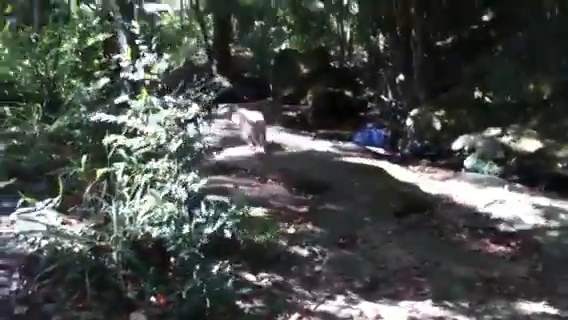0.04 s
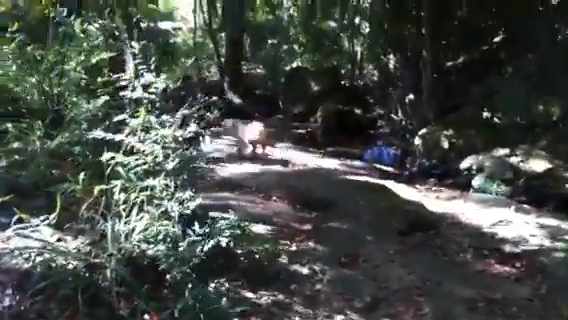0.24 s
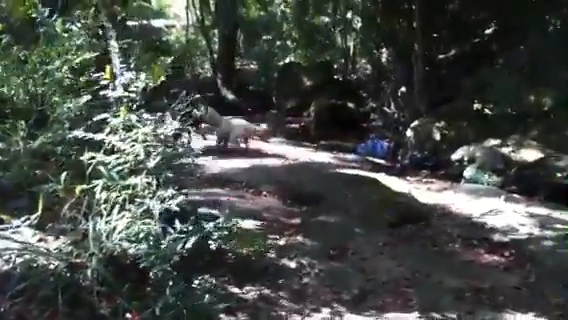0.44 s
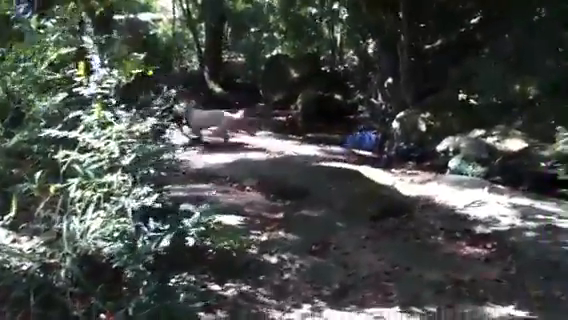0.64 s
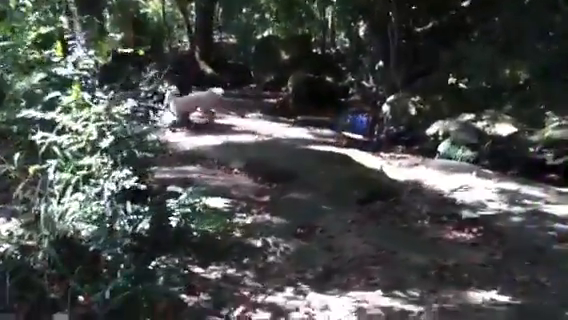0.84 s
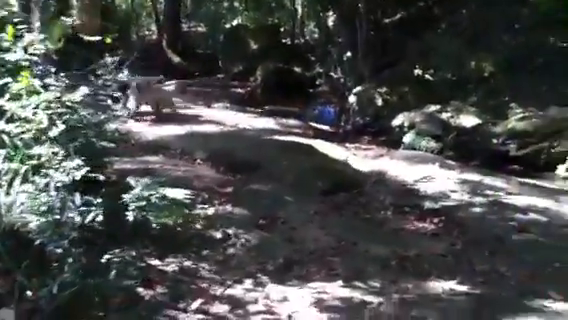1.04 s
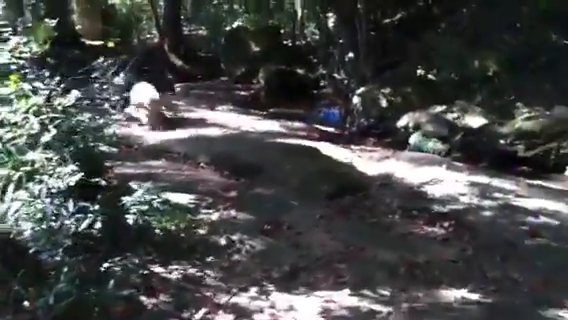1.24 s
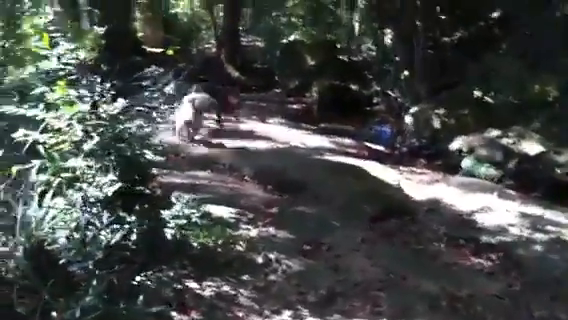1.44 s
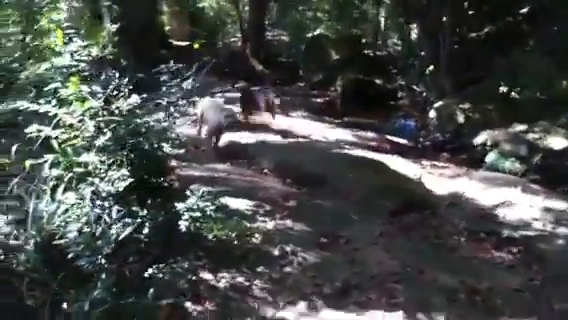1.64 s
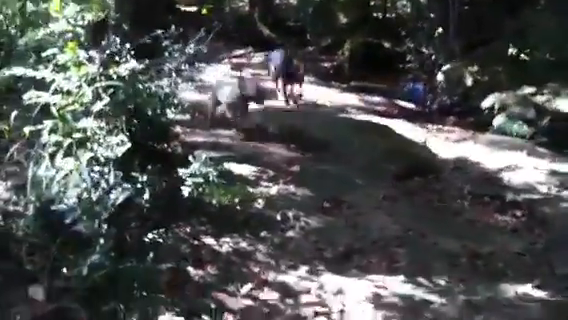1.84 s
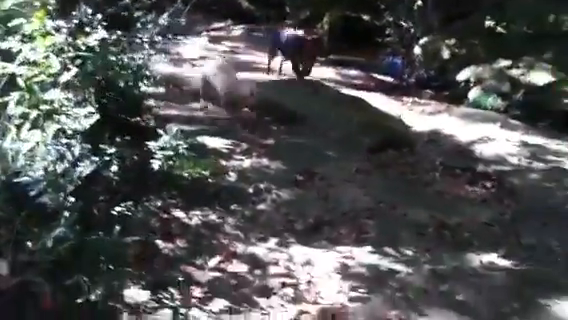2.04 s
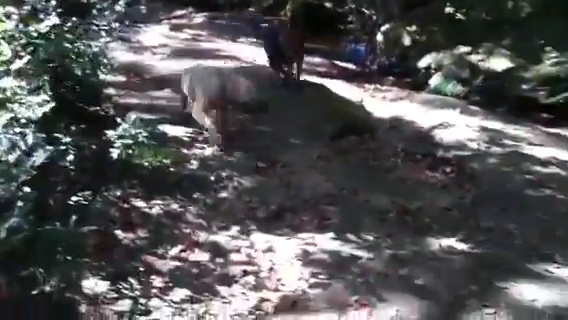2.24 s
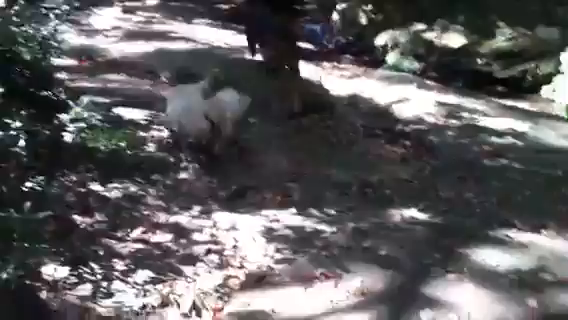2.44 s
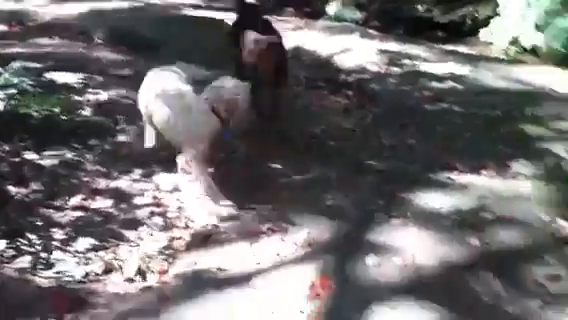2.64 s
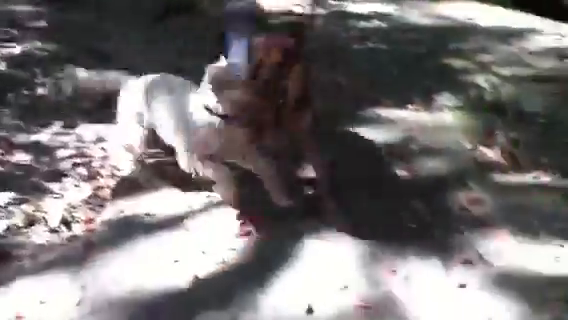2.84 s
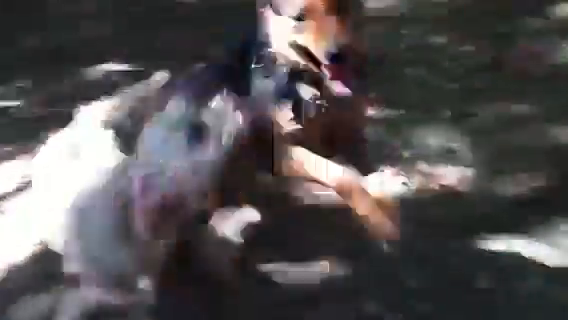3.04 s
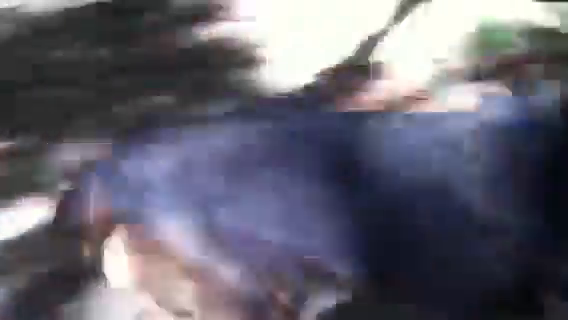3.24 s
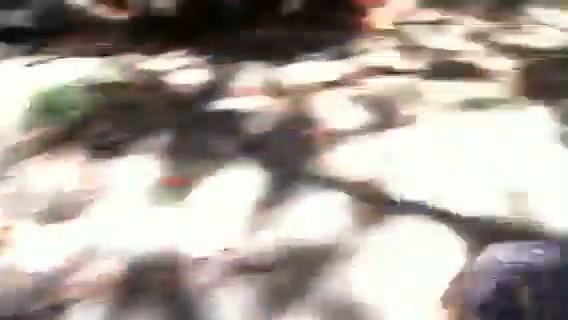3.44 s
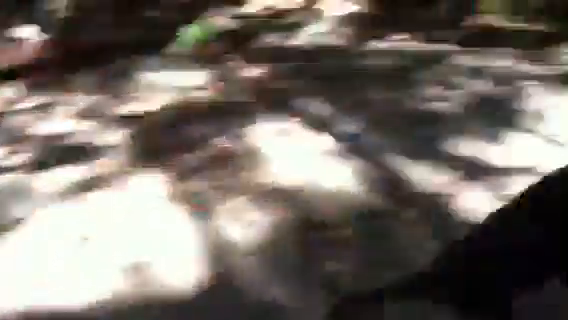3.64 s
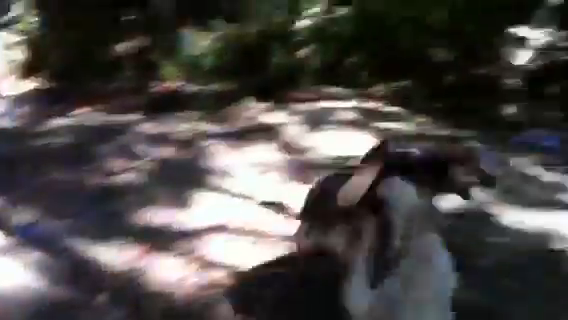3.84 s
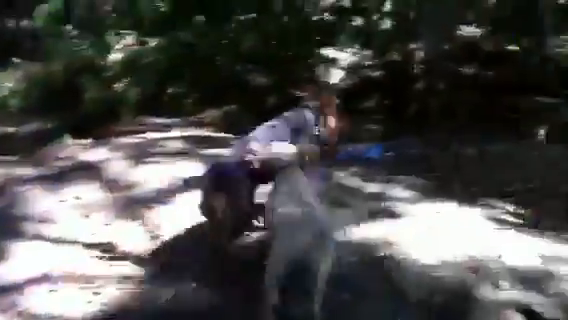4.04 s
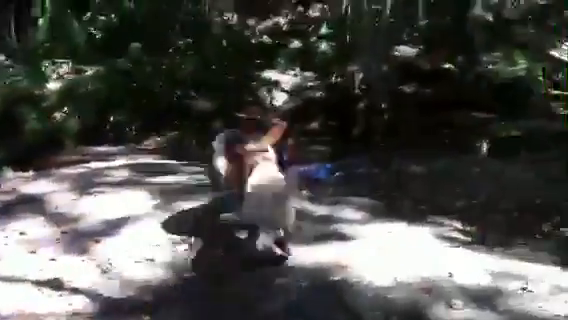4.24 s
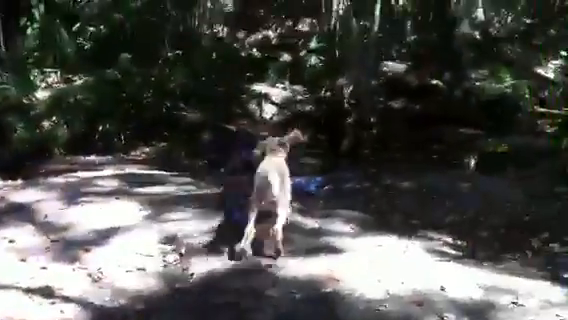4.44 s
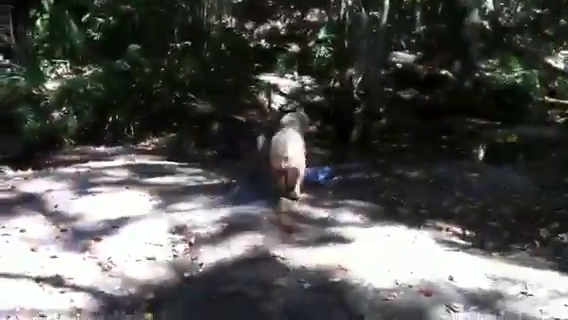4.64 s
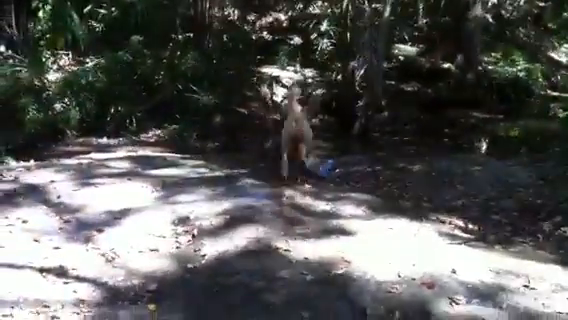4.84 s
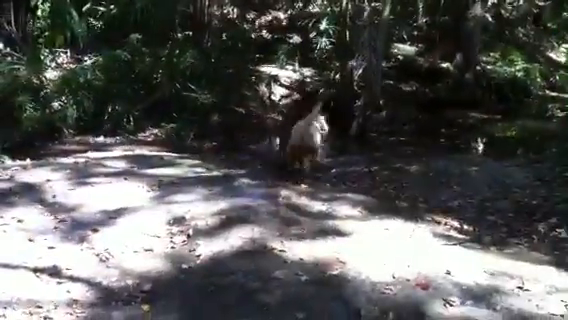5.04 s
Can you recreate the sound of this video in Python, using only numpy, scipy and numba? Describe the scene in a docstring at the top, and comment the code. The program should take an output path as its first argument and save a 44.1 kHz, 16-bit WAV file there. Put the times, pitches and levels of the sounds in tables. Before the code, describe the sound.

Dogs wrestle on a leafy forest track: faint grunts, a sharp twig snap, then loud rough growls close by amid scuffing dry leaves.

```python
"""Dogs wrestling on a forest track

Dogs wrestle close to a phone on a leafy track: uneven vocal-fold flaps and the air they let through
drive chest, mouth and teeth resonances as long rough growls and short grunts. Shaped noise makes paws
scuffing dry leaves and grit, thudding and shaking the earth; ringing modes make a clinking collar tag
and one twig that snaps close by. Noise of a slowly wavering level is the hush of the woods behind.
"""
import sys
import numpy as np
from scipy import signal
from scipy.fft import rfft, irfft, next_fast_len
from scipy.io import wavfile
from scipy.ndimage import uniform_filter1d, map_coordinates
from numba import njit

SR = 44100
rng = np.random.default_rng(int(sys.argv[2]) if len(sys.argv) > 2 else 0)


def magnitude_from_level(level_db):
    """Linear magnitude for a level in decibels (20 dB per decade)."""
    exponent = np.asarray(level_db, float) / 20
    return 10 ** exponent


def file_out(sig):
    """Save sig as 16-bit WAV at sys.argv[1]."""
    # one column per channel
    cols = np.atleast_2d(sig).T
    # limit, then scale
    lim = np.clip(cols, -1, 1)
    pcm = np.round(lim * 32767).astype(np.int16)
    wavfile.write(sys.argv[1], SR, pcm)


N = 225262  # samples, about 5.1 s

# Leaves stirred by running dogs. Each row: time in seconds, level in dB.
LEAF_LEVEL = [(0.0, -52.5), (0.41, -55), (1.16, -59), (1.45, -51.5), (1.56, -59), (1.77, -55), (1.93, -51),
              (2.09, -55), (2.32, -59.5), (2.53, -49.5), (2.67, -53), (2.81, -51), (3.45, -51.5),
              (3.64, -48.5), (3.91, -48), (4.16, -54), (4.42, -58.5), (4.53, -48.5), (4.84, -61.5),
              (5.1, -53.5)]
# Spectrum of dry leaves. Each row: frequency in Hz, relative density in dB per Hz.
LEAF_SPECTRUM = [(500, 0), (1200, -1), (3000, 0), (4500, 2), (7000, 0), (10000, -1), (13000, -2.5),
                 (15500, -7), (16000, -63)]


def unit(x):
    """Scale to rms 1."""
    return x / np.sqrt(np.mean(x ** 2) + 1e-20)


def curves(rows, outside):
    """One value per sample for each column after the time; outside=None holds the end values."""
    s, *cols = np.transpose(rows)
    return [np.interp(np.arange(N) / SR, s, c, outside, outside) for c in cols]


def wobble(rate):
    """A smooth random curve, rate knots a second."""
    knots = rng.standard_normal(int(N * rate / SR) + 4)
    return map_coordinates(knots, [np.arange(N) * rate / SR])


def filtered(x, response):
    """x times a complex response of frequency."""
    m = next_fast_len(len(x) + 8192)
    spectrum = rfft(x, m) * response(np.fft.rfftfreq(m, 1 / SR))
    return irfft(spectrum, m)[:len(x)]


def colour(points):
    """Gain of (Hz, dB) points on a log axis."""
    f, db = np.transpose(points)
    return lambda hz: magnitude_from_level(np.interp(np.log(hz + 1), np.log(f + 1), db))


def modes(table):
    """Causal response of (Hz, width in Hz, dB) resonances, alternating in sign."""
    def response(f):
        total = 0
        for k, (centre, width, db) in enumerate(table):
            damping = 1j * f * width
            total = total + (-1) ** k * magnitude_from_level(db) * damping / (centre * centre - f * f + damping)
        return total
    return response


@njit
def sliding(x, hz, width_hz, sr):
    """A resonance whose centre moves sample by sample."""
    y, r = np.zeros(len(x)), np.exp(-np.pi * width_hz / sr)
    for i in range(2, len(x)):
        turn = 2 * r * np.cos(2 * np.pi * hz[i] / sr)
        y[i] = x[i] - x[i - 2] + turn * y[i - 1] - r * r * y[i - 2]
    return y


def folds(rate_hz, jitter, scatter_db):
    """Slack vocal folds: uneven flaps, and the noisy air that each lets through."""
    phase = np.cumsum(rate_hz * np.exp(jitter * wobble(60) + .1 * wobble(4))) / SR
    flaps = np.diff(np.floor(phase), prepend=0) * magnitude_from_level(scatter_db * wobble(70))
    # each opening decays with a 4 ms time constant
    opening = unit(signal.lfilter([1], [1, -np.exp(-1 / (.004 * SR))], flaps))
    air = (opening + .9) * rng.standard_normal(N)
    return unit(flaps), unit(air)


def even(x):
    """Steady lung pressure holds the power constant over a few flaps."""
    return x / np.sqrt(np.abs(uniform_filter1d(x ** 2, size=2200)) + 1e-9)


def grunt(s, held, db, mouth_db, hz, rasp_db):
    """Quick attack, a sagging hold and a release, as growl rows; the mouth opens on the way."""
    attack_s, release_s = 0.017, 0.05
    edge_db, sag_db, opens_db = 22, 7, 3
    times = s + np.cumsum([0, attack_s, held, release_s])
    levels = db - np.array([edge_db, 0, sag_db, edge_db])
    opens = opens_db * np.array([-.5, -.5, .5, .5])
    return [(t, level, mouth_db + o, hz, rasp_db + o) for t, level, o in zip(times, levels, opens)]


def growls():
    """The flaps thump in the chest; flaps and air rasp through the moving mouth."""
    # Long growls, one list each. Each row: time in seconds, chest level in dB, mouth in dB over chest,
    # mouth resonance in Hz, rasp in dB over chest.
    growl_rows = [
        [(0.56, -70, -2, 738, 3), (0.572, -62, -9, 790, -9), (0.632, -47.5, -0.5, 744, -17),
         (0.718, -46.5, -7.5, 813, -21), (0.74, -47.5, -13, 692, -26), (0.764, -50, 1, 680, -12),
         (0.874, -47, -3.5, 805, -28), (1.024, -49.5, -3.5, 684, -2.5), (1.075, -60, 0, 800, -16)],
        [(3.025, -56.5, 10, 930, 6.5), (3.084, -59, 13.5, 820, 6), (3.105, -48, -1, 1060, -22),
         (3.14, -40, 8, 696, -30), (3.158, -38.5, -10, 720, -17), (3.196, -37.5, 1.5, 860, -14),
         (3.225, -40.5, 6.5, 1030, -15), (3.25, -41, 0, 990, -26), (3.275, -37, 1.5, 1000, -10),
         (3.312, -36.5, 3.5, 860, -9), (3.362, -41, 2.5, 670, -10), (3.39, -65, -29, 711, -10)],
        [(3.58, -64, -15, 694, 14), (3.598, -54, 9, 664, 15), (3.618, -35.5, 2.5, 710, -22),
         (3.645, -36.5, 0, 780, -19), (3.668, -38.5, -2, 876, -27), (3.73, -38.5, 1.5, 725, -32),
         (3.764, -41.5, 5, 910, -18), (3.798, -31.5, -9, 740, -27), (3.814, -42, 3, 660, -19),
         (3.84, -37.5, 2.5, 730, -24), (3.872, -36.5, 0, 1060, -22), (3.884, -44, 4.5, 880, -27),
         (3.916, -43.5, 6, 870, -23), (3.976, -35.5, 2.5, 705, -26), (4.038, -56.5, -0.5, 700, -16)],
        [(4.245, -55, -2, 863, 12), (4.261, -53, 8, 870, -12), (4.277, -40, 3.5, 870, -3),
         (4.33, -41, -7.5, 884, -15.5), (4.46, -45.5, -5, 910, -12.5), (4.513, -50, -3, 730, -22),
         (4.579, -42, -2.5, 830, -14), (4.607, -47.5, 1.5, 876, -9), (4.681, -42, 0, 840, -11),
         (4.72, -71, -5, 775, 1)],
    ]
    # Short grunts and snorts. Each row: start in seconds, hold in seconds, chest level in dB,
    # mouth in dB over chest (mid-opening), mouth resonance in Hz, rasp in dB over chest (mid-opening).
    grunt_rows = [(0.05, 0.11, -50.5, -34, 730, -36), (0.29, 0.022, -49, -14, 754, -18),
                  (1.712, 0.022, -51, -8, 1010, -3), (2.392, 0.035, -41.5, -5, 640, -5),
                  (2.692, 0.017, -45.5, -16, 950, -9), (2.725, 0.017, -52, 9.5, 970, 4.5),
                  (3.438, 0.096, -53, 11, 562, 9.5), (5.003, 0.012, -49.5, 0, 775, 3),
                  (5.034, 0.064, -61.5, 15.5, 1020, 16)]
    # Vocal folds from call to call. Each row: time in seconds, mean flaps a second, unevenness 0-1.
    fold_rows = [(1.1, 72, .16), (3.1, 92, .22), (4.02, 98, .25), (4.3, 72, .17)]
    # The chest resonance moves with the neck. Each row: time in seconds, mean centre in Hz.
    chest_rows = [(0.63, 208), (0.95, 278), (3.1, 208), (3.62, 167), (3.8, 222), (3.85, 171), (4.02, 213),
                  (4.32, 202), (4.4, 287), (4.48, 216), (4.59, 282), (4.7, 240)]
    # The resonance behind the teeth moves with the tongue. Each row: time in seconds, mean centre in Hz.
    tongue_rows = [(1.05, 2010), (2.75, 1500), (3.2, 2150), (3.31, 2200), (3.36, 1800), (3.6, 1620),
                   (3.75, 1910), (4.0, 1640), (4.26, 1920), (4.68, 2650), (5.0, 1590)]
    # Fixed throat resonance, passed twice. Each row: centre in Hz, width of one pass in Hz, level in dB.
    deep_modes = [(130, 95, 0)]
    # Fixed upper throat resonances. Each row: centre in Hz, width in Hz, relative level in dB.
    upper_modes = [(1614, 740, 0.92), (2750, 210, -2.2), (2840, 154, -1.6)]

    chest, mouth, rasp = np.zeros((3, N))
    calls = list(growl_rows) + [grunt(*row) for row in grunt_rows]
    for rows in calls:
        chest_db, mouth_db, _, rasp_db = curves(rows, -120)
        chest += magnitude_from_level(chest_db)
        mouth += magnitude_from_level(chest_db + mouth_db)
        rasp += magnitude_from_level(chest_db + rasp_db)
    chest, mouth, rasp = uniform_filter1d([chest, mouth, rasp], size=300)
    mouth_hz = curves(sorted(map(tuple, np.vstack(calls))), None)[2]

    flaps, air = folds(*curves(fold_rows, None), scatter_db=2)
    thump = flaps + .9 * air
    snarl = .5 * flaps + air

    chest_hz = curves(chest_rows, None)[0] * np.exp(.05 * wobble(25))
    deep = unit(filtered(thump, lambda f: modes(deep_modes)(f) ** 2))
    chest_ring = unit(sliding(sliding(thump, chest_hz, 127.0, SR), chest_hz, 270.0, SR))
    low = chest_ring - magnitude_from_level(-3 + 1.5 * wobble(25)) * deep

    # broad breath between the mouth resonances
    high = magnitude_from_level(-3) * unit(filtered(snarl, lambda f: modes([(880, 1400, 0)])(f) ** 2))
    # three resonances slide with the jaw; each also wanders and flutters on its own
    for hz, db in [(270 + 0.37 * mouth_hz, -5), (mouth_hz, 0), (870 + 0.4 * mouth_hz, -6)]:
        hz = hz * np.exp(.045 * wobble(28))
        ring = unit(sliding(sliding(snarl, hz, 120.0, SR), hz, 340.0, SR))
        high = high + magnitude_from_level(db + 3.5 * wobble(45)) * ring

    teeth = unit(filtered(snarl, lambda f: modes(upper_modes)(f) * modes([(2500, 2200, 0)])(f)))
    tongue_hz = curves(tongue_rows, None)[0] * np.exp(0.072 * wobble(20))
    front = unit(sliding(sliding(snarl, tongue_hz, 130.0, SR), tongue_hz, 410.0, SR))
    teeth = magnitude_from_level(2.5 * wobble(35)) * teeth + magnitude_from_level(2.5 * wobble(35)) * front
    return chest * even(low) + mouth * even(high) + rasp * even(teeth)


def bursts():
    """A hard flap of the vocal folds rings mouth and chest for a few cycles."""
    # The hardest single flaps. Each row: start in seconds, level in dB, mouth resonance in Hz.
    hard_flaps = [(0.83, -36, 762), (0.898, -44, 880), (0.979, -38, 550), (2.412, -39, 720),
                  (3.098, -33, 960), (3.134, -22.5, 615), (3.185, -27, 1100), (3.194, -31, 1020),
                  (3.274, -26, 1080), (3.292, -23.5, 1010), (3.306, -26.5, 782), (3.593, -26.5, 1590),
                  (3.626, -25.5, 1150), (3.663, -24, 876), (3.746, -24.5, 823), (3.812, -23.5, 480),
                  (3.823, -20.5, 750), (4.273, -23, 833), (4.309, -38, 2010), (4.672, -28.5, 766),
                  (5.052, -30, 820)]
    out, t = np.zeros(N + SR), np.arange(SR // 20) / SR
    shape = (1 - np.exp(-t / .0005)) * np.exp(-t / .006)
    phases = rng.random((len(hard_flaps), 2)) * 2 * np.pi
    for (s, db, hz), phase in zip(hard_flaps, phases):
        mouth = np.sin(2 * np.pi * hz * t + phase[0])
        chest = 0.31 * np.sin(2 * np.pi * 210 * t + phase[1])
        out[round(s * SR):][:len(t)] += magnitude_from_level(db) * shape * (mouth + chest)
    return out[:N]


def trees(x):
    """Trunks and ground scatter a short tail back, after a gap of 4 ms."""
    t = np.arange(SR // 3) / SR
    tail = rng.standard_normal(len(t)) * magnitude_from_level(-60 * t / 0.78) * (t > .004)
    return signal.fftconvolve(x, tail / np.linalg.norm(tail))[:N]


def struck(blows, table, attack):
    """A hard thing rings in its modes after each blow, rising with a time constant in seconds."""
    out, t = np.zeros(N + SR), np.arange(SR // 20) / SR
    for s, level_db, share in blows:
        ring = np.zeros(len(t))
        for hz, db, t60 in table:
            ring += magnitude_from_level(db - 60 * t / (share * t60)) * np.sin(2 * np.pi * hz * t)
        out[round(s * SR):][:len(t)] += magnitude_from_level(level_db) * ring * (1 - np.exp(-t / attack))
    return out[:N]


def twig():
    """A twig close by cracks, then once more weakly, in quickly damped modes of the wood."""
    # Each row: start in seconds, level in dB, share of the free ring time.
    snaps = [(1.3834, -12, 1), (1.3878, -34, 1)]
    # Modes. Each row: frequency in Hz, relative level in dB, free time to fall 60 dB in seconds.
    wood_modes = [(660, -32, 0.049), (1150, 3, 0.0043), (1650, 8, 0.0053), (3800, 10, 0.0017),
                  (9000, 3.5, 0.0017), (11500, 2, 0.0019), (14500, -7, .003)]
    return struck(snaps, wood_modes, attack=0.00045)


def collar_tag():
    """A collar tag clinks in high modes, first faint and short, later louder and longer."""
    # Each row: start in seconds, level in dB, share of the full ring time.
    clinks = [(2.3045, -39, .35), (2.31, -41, .45), (2.339, -45, .45), (4.8042, -32, 1)]
    # Modes. Each row: frequency in Hz, relative level in dB, full time to fall 60 dB in seconds.
    tag_modes = [(5590, -10, .012), (8150, -1, .016), (11000, -3, .014), (14270, 1, .042)]
    return struck(clinks, tag_modes, attack=.0001)


def thuds():
    """A paw landing hard on packed earth gives a short dull puff of noise around 790 Hz."""
    # Each row: start in seconds, level in dB before the decay.
    landings = [(1.578, -48.5), (1.876, -36), (2.935, -40.5), (4.181, -40), (4.902, -44.5)]
    out, t = np.zeros(N + SR), np.arange(SR // 20) / SR
    for s, db in landings:
        puff = unit(filtered(rng.standard_normal(len(t)), modes([(790, 780, 0)])))
        out[round(s * SR):][:len(t)] += magnitude_from_level(db - 60 * t / 0.1) * puff * (1 - np.exp(-t / 0.00044))
    return out[:N]


def scuffs():
    """Each leaf sound is a spray of noise in sub-millisecond lumps, broad with one bright band."""
    # Dry leaves cracking under a paw, sudden and then fading; the low row at 1.88 s is the sharp start of a paw
    # landing. # Each row: peak time in seconds, level in dB, time to fall 7 dB in ms, bright band in Hz.
    cracks = [(0.039, -43, 3.8, 4500), (0.062, -41, 2, 10200), (0.163, -44.5, 2.2, 5000),
              (0.346, -35, 0.66, 6630), (0.351, -38, 3.1, 12000), (0.868, -37.5, 0.63, 5160),
              (1.084, -46, 4.2, 6150), (1.476, -35, 2.7, 9500), (1.506, -42.5, 2.8, 2950),
              (1.562, -44, 1.6, 2980), (1.88, -42, 0.9, 1210), (1.93, -32.5, 7.3, 4300),
              (2.252, -43.5, 4.9, 5100), (2.524, -37, 32, 11500), (2.573, -37.5, 4.4, 4060),
              (2.936, -29.5, 5.8, 11500), (3.022, -39, 27, 8700), (3.42, -35.5, 19, 6700),
              (3.433, -30, 2.9, 8700), (3.49, -33, 3, 5940), (3.584, -40, 23, 5950),
              (3.683, -37.5, 49, 3300), (3.703, -39.5, 31, 3720), (3.931, -45.5, 20, 3540),
              (4.042, -39.5, 10, 8040), (4.058, -33, 5.2, 7800), (4.08, -40, 5.3, 5000),
              (4.854, -49.5, 104, 2530), (5.026, -38, 1.9, 2515)]
    # Leaf scuffs and clicks with similar rise and fall, from a few ms to tens of ms.
    # Each row: peak time in seconds, level in dB, time to rise the last 7 dB in ms, bright band in Hz.
    even_scuffs = [(0.317, -42, 9.8, 9800), (1.315, -44.5, 15.4, 5470), (1.583, -44.5, 2.7, 6400),
                   (1.785, -44.5, 18.6, 4970), (1.878, -42, 26, 11500), (2.294, -42.5, 5.9, 4870),
                   (2.469, -39, 4.5, 11500), (2.505, -43, 15, 9000), (2.611, -34, 3, 5060),
                   (2.683, -42.5, 5.3, 5100), (2.708, -42, 8.2, 6000), (2.76, -45, 22, 2530),
                   (2.833, -38.5, 10.4, 7200), (2.869, -38.5, 2.5, 9100), (3.086, -43, 17, 5550),
                   (3.184, -39.5, 14, 9900), (3.194, -31.5, 3.4, 6000), (3.364, -40, 3, 5700),
                   (3.522, -30, 5.7, 3870), (3.78, -41.5, 9.7, 11500), (3.971, -37.5, 5.1, 14500),
                   (4.454, -47, 25, 5050), (4.628, -43, 27, 3950), (5.042, -45, 15, 2610)]
    crack_rise_ms, fall_share = 0.6, 0.92  # the share is fall time over rise time
    rows = [(s, db, crack_rise_ms, fall, hz) for s, db, fall, hz in cracks]
    rows += [(s, db, rise, fall_share * rise, hz) for s, db, rise, hz in even_scuffs]

    def leaf_band(hz):
        """Leaf spectrum thinned in the bass, plus the bright band."""
        band = modes([(hz, .3 * hz, 1.5)])
        return lambda f: 1.8 * colour(LEAF_SPECTRUM)(f) * f / (f + 0.2 * hz) + band(f)

    out, t = np.zeros(N + SR), np.arange(-SR // 20, SR // 10) / SR
    for s, db, rise_ms, fall_ms, hz in rows:
        lumps_db = 3.2 * rng.standard_normal(len(t) // 30 + 1).repeat(30)[:len(t)]
        spray = rng.standard_normal(len(t)) * magnitude_from_level(lumps_db)
        spray = unit(filtered(spray, leaf_band(hz)))
        swell = magnitude_from_level(-7 * np.abs(1000 * t / np.where(t < 0, rise_ms, fall_ms)) ** 1.3)
        out[round(s * SR):][:len(t)] += magnitude_from_level(db) * swell * spray
    return out[SR // 20:][:N]  # t = 0 lands on the peak time


def crackle(per_s, spread_db):
    """Random one-sample cracks, their sizes scattered exponentially in dB."""
    size = magnitude_from_level(spread_db * np.minimum(rng.exponential(size=N), 3))
    return unit((rng.random(N) < per_s / SR) * rng.standard_normal(N) * size)


def rustle():
    """Leaf hiss in quick clumps, and small cracks that each ring for a moment in a band of their own."""
    level_db, = curves(LEAF_LEVEL, None)
    cracks = np.zeros(N)
    for hz in (3000, 5000, 8000, 12500):
        ring = filtered(crackle(90, spread_db=-4.5), modes([(hz, 0.69 * hz, 0)]))
        cracks += ring * magnitude_from_level(-10 * np.log10(hz))  # offsets the greater width of the high bands
    clumps_db = 1.2 * wobble(6) + 2 * wobble(35) + 1.5 * wobble(120)
    hiss = unit(filtered(magnitude_from_level(clumps_db) * rng.standard_normal(N), colour(LEAF_SPECTRUM)))
    return magnitude_from_level(level_db) * unit(hiss + .5 * unit(cracks))


def ground():
    """Paws shake the earth in lumps, far more when the dogs are near and the leaves loud."""
    # The rumble of running paws. Each row: frequency in Hz, relative density in dB per Hz.
    rumble_spectrum = [(20, -1), (50, 2), (80, -12), (120, -74)]
    level_db, = curves(LEAF_LEVEL, None)
    rumble = filtered(rng.standard_normal(N), colour(rumble_spectrum))
    lumps = unit(magnitude_from_level(3.5 * wobble(9)) * rumble)
    # 2 dB of rumble for each dB of leaves
    return magnitude_from_level(-48.5 + 2.0 * (level_db - level_db.max())) * lumps


def woods():
    """Far leaves in light wind and the microphone's own hiss, as one noise of wavering level."""
    # Each row: frequency in Hz, relative density in dB per Hz.
    hush_spectrum = [(25, -6), (60, 8), (140, 15), (290, 13.5), (700, 10), (1700, 2), (4000, -3.5),
                     (9000, -12), (15500, -78), (16000, -44)]
    level_db = -58 + 2.38 * wobble(2.267)
    return magnitude_from_level(level_db) * unit(filtered(rng.standard_normal(N), colour(hush_spectrum)))


def scene():
    """All sources in one channel; only the voices get the tail from the trees."""
    voices = growls() + bursts()
    voices = voices + magnitude_from_level(-16) * trees(voices)
    paws = thuds() + scuffs() + rustle() + ground()
    return (voices + twig() + collar_tag() + paws + woods())[None]


def roll_off(x):
    """The treble ends steeply here."""
    return signal.sosfilt(signal.butter(12, 16650, fs=SR, output="sos"), x)


def record(dry):
    """The microphone drops the deep bass; a steep cut then removes most above 15950 Hz."""
    def bass_cut(f):
        """Third-order high-pass at 105 Hz, with a little let through unfiltered."""
        return 0.079 + signal.freqs(*signal.butter(3, 105, "high", analog=True), f)[1]

    thin = filtered(dry[0], bass_cut)
    thin = filtered(thin, lambda f: np.where(f < 15950, 1, magnitude_from_level(-28)))
    return roll_off(thin[None])


dry = scene()
out = record(dry)
file_out(out)
```